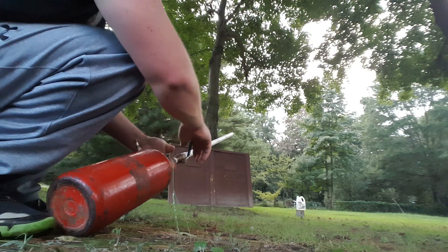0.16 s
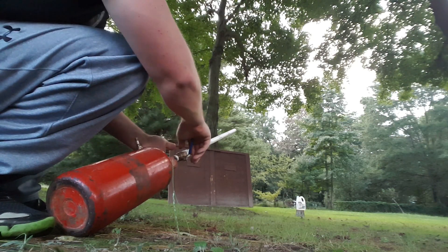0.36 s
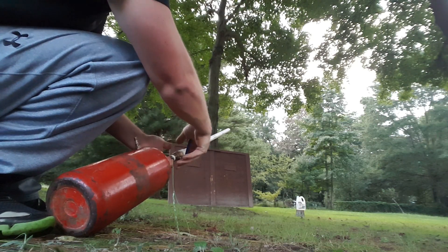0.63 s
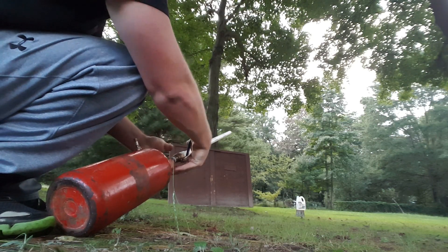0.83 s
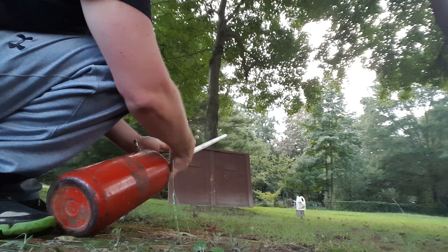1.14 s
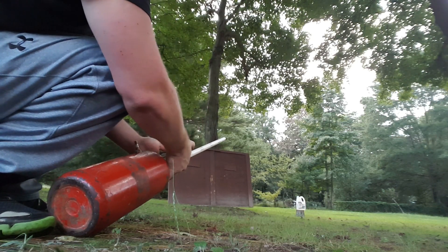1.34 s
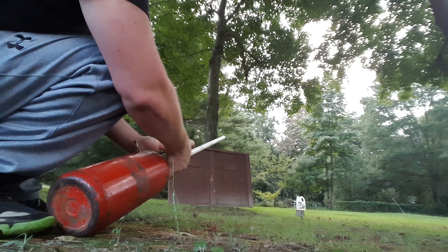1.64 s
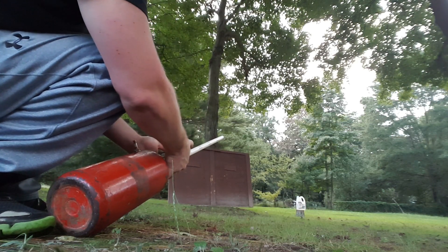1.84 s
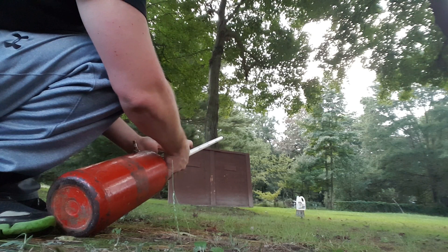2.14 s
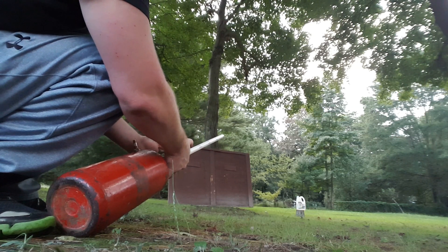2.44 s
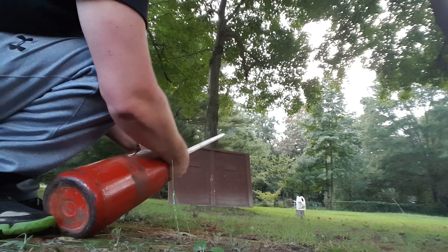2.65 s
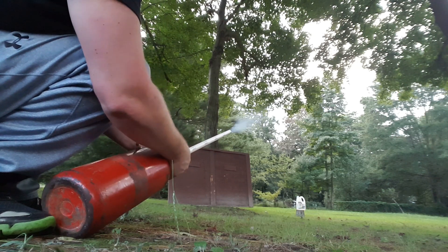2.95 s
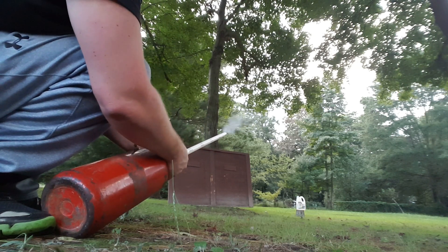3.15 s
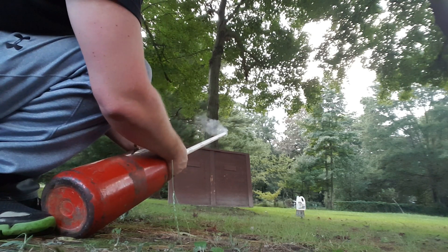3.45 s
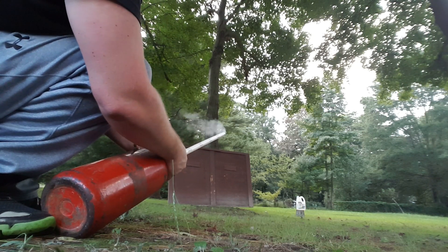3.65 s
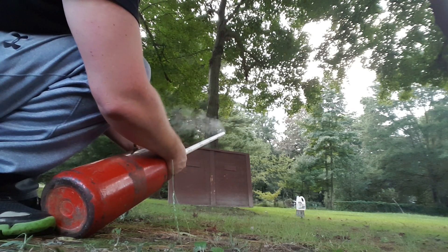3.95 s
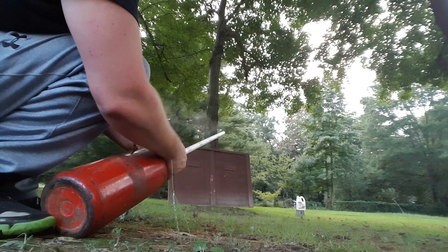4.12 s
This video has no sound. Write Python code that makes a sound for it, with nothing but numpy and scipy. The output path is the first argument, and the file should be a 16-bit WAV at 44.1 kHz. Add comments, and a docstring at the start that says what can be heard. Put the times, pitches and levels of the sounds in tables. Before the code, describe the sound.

A very quiet garden with rasping crickets and barely audible handling clicks is broken by an abrupt, overloaded bang right beside the microphone. A dense rush of escaping air follows, losing its bass first, whistling downward and collapsing into a brief hollow barrel hoot. The echo scatters through trees and dies away, leaving the hushed background turned down by automatic gain and slowly creeping back.

```python
"""A homemade air cannon is fired close by on a lawn, with insects chirping in the trees.
First, hands rub the tank and tick its valve. Then the valve opens and a shock leaves the barrel.
The tank empties in half a second of hiss: shaped noise for the roar, and a whistle that sinks with the pressure.
The trees echo it as a fading scatter of reflections. Behind it all lie far traffic, a faint hum and the insects.
A gain control turns everything down when it gets loud, then lets it creep back."""
import sys
import numpy as np
from scipy import signal
from scipy.fft import rfft, irfft
from scipy.io import wavfile

SR = 44100
rng = np.random.default_rng(int(sys.argv[2]) if len(sys.argv) > 2 else 0)


def dump(signal):
    """Clip the signal to [-1, 1] and save it as 16-bit WAV at the path in sys.argv[1]."""
    limited = np.clip(np.atleast_2d(signal).T, -1, 1)
    pcm = np.round(limited * 32767).astype(np.int16)
    wavfile.write(sys.argv[1], SR, pcm)


N = 189008
TIME = np.arange(N) / SR
FREQS = np.fft.rfftfreq(N, 1 / SR)

# colour of far traffic and faint hiss: (frequency [Hz], relative level per Hz [dB])
GARDEN_COLOUR = [(20, -24.5), (45, -13.5), (80, 0.5), (135, 0), (300, -11.5), (500, -17), (1200, -24.5),
                 (2100, -30), (3200, -38), (5500, -45.5), (7900, -40), (9700, -52.5), (12500, -49),
                 (15600, -43.5)]
# how alike left and right are in the garden: (frequency [Hz], correlation [-1 to 1])
GARDEN_LIKENESS = [(25, .75), (60, .92), (130, 1), (290, 0.77), (640, .15), (1410, -0.48), (3100, 0),
                   (15000, -0.068)]
# hum of a far machine: (frequency [Hz], level [dB])
MACHINE_HUM = [(118.4, -59), (1179, -69), (1222, -79)]
# bush crickets rasp at a steady pace:
# (middle of first call [s], end of song [s], period [s], call length [s], pitch [Hz], level [dB])
CRICKET_SONGS = [(.17, 2.7, .301, .16, 6315, -66.5), (3.62, 4.4, 0.3115, .16, 6320, -68.5),
                 (.19, 4.4, .327, .22, 6880, -68)]
# purer chirps that scoop up to their pitch: (middle [s], half length [s], level [dB])
PURE_CHIRPS = [(0.097, .06, -69.5), (.8, 0.15, -73), (1.51, .09, -72), (2.05, 0.111, -74), (4.15, .12, -79)]
# hands and cloth rub on the tank: (middle [s], length [s], centre [Hz], width [Hz], level [dB])
HAND_RUBS = [(0.798, 0.019, 5000, 7000, -65), (1.08, .12, 5970, 5000, -65.5), (1.29, 0.18, 3600, 550, -65),
             (2.319, 0.12, 3820, 300, -67.5)]
# the valve handle ticks under the fingers: (middle [s], level [dB])
HANDLE_TICKS = [(.835, -66), (1.635, -68), (2.154, -67), (2.299, -60), (2.56, -65.5)]
# how long the trees' echo takes to fade by 60 dB: (frequency [Hz], time [s])
TREE_FADE = [(200, 1), (1200, 0.46), (3300, 0.78), (6000, 0.55), (9000, 0.6), (11500, .6), (15000, .5)]
# how alike left and right are in the jet: (frequency [Hz], correlation [-1 to 1])
JET_LIKENESS = [(100, 0.99), (2100, 0.98), (2800, 0.73), (3200, 0.015), (3800, 0.012), (5200, .6),
                (7400, 0.93), (9000, 0.8), (9800, 0.094), (11000, -0.43), (12400, 0.21), (15000, 0.7)]
# colour of the roar from a full tank: (frequency [Hz], relative level per Hz [dB])
FULL_TANK = [(30, -18), (130, -3.5), (400, -3), (800, -2), (1300, -5), (2000, -5.5), (3200, -7.5),
             (4600, -8), (6500, -0.5), (7600, 0.5), (9200, 3.5), (9800, -10.5), (15600, -24.5)]
# colour of the roar from a nearly empty tank: (frequency [Hz], relative level per Hz [dB])
EMPTY_TANK = [(30, -23.5), (150, -17.5), (400, -20), (800, -7.5), (1700, -3.5), (2600, -5.5), (3600, -2.5),
              (4700, -3), (5700, 1), (7500, 0.5), (9200, 1), (9800, -11.5), (15600, -24)]
# colour of the fine fizz: (frequency [Hz], relative level per Hz [dB])
FIZZ_COLOUR = [(6000, -35.5), (9200, -8.5), (9700, 3), (11600, 4.5), (12350, 5), (12900, 6.5), (14300, 0),
               (15100, 3.5), (15500, 4.5)]
# fine fizz comes in two spurts: (middle [s], half length [s], level against the flow [dB])
FIZZ_SPURTS = [(2.68, .022, -2.5), (2.84, .11, -3)]
# valve resonances that need high pressure: (frequency [Hz], width [Hz], level against the flow [dB])
VALVE_MODES = [(7160, 160, -16), (7940, 130, -18.5), (8850, 150, -12), (9280, 170, -13)]
# the whistle catches twice: (middle [s], half length [s], width [Hz], level against the flow [dB])
WHISTLE_CATCHES = [(2.788, .16, 604, 0.5), (3.065, 0.026, 300, -4)]
# the barrel hoots as the last air leaves: (frequency [Hz], width [Hz], level [dB])
BARREL_MODES = [(744.5, 25, -40), (926, 50, -42.5), (1110, 110, -39.5), (1690, 40, -37.5),
                (1842, 55, -39.5), (1990, 83, -41.5), (2594, 66, -41), (2730, 47, -49), (3320, 70, -44)]

BANG_S = 2.6488
# the flow starts at the bang, sags slowly while the tank holds pressure, then collapses ever faster
FLOW_DB, ATTACK_S, SAG_DB_PER_S = 1.1, 0.0034, 17
COLLAPSE_S, COLLAPSE_DB_PER_S2 = 2.9897, 882


def amp(db):
    """Turns decibels into a gain."""
    return 10 ** (np.asarray(db) / 20)


def unit(x):
    """Scales a signal to an average strength (rms) of 1."""
    return x / np.sqrt(np.mean(x ** 2) + 1e-20)


def read(points, hz):
    """Joins (frequency, value) points by straight lines on a log-frequency axis."""
    f, value = np.transpose(points)
    return np.interp(np.log(hz + 1), np.log(f + 1), value)


def lag(x, seconds):
    """Smooths a signal so that it follows its input with a delay, like a slow needle."""
    keep = np.exp(-1 / (abs(seconds) * SR))
    return signal.lfilter([1 - keep], [1, -keep], x)


def peak(hz, width_hz, freqs=FREQS):
    """Gain of a steep-sided resonance; the width is taken at half power."""
    return 1 / (1 + ((freqs - hz) / (.78 * width_hz)) ** 2)


def noise(gain, likeness):
    """Stereo noise of rms 1 with a given gain and left-right likeness at each frequency."""
    a, b = rfft(rng.standard_normal((2, N)))
    correlation = np.clip(read(likeness, FREQS), -1, 1)
    mid = a * np.sqrt(1 + correlation)
    side = b * np.sqrt(1 - correlation)
    return unit(irfft(np.array([mid + side, mid - side]) * gain, N))


def resonant_noise(modes, likeness):
    """Turbulence rings in a set of resonances, each at its own rms level."""
    power = sum(amp(db) ** 2 * unit(peak(hz, width)) ** 2 for hz, width, db in modes)
    return np.sqrt(power.mean()) * noise(np.sqrt(power), likeness)


def wander(width_hz):
    """Random motion of rms 1; a smaller width makes it slower."""
    return unit(irfft(rfft(rng.standard_normal(N)) * peak(0, width_hz), N))


def swell(middle_s, half_s):
    """A smooth rise and fall of height 1."""
    return np.exp(-((TIME - middle_s) / half_s) ** 2)


def fuzzy_tone(pitch_hz, width_hz, spread):
    """A stereo noise band that follows a pitch curve; spread 0 is mono, 1 is unlike in the two channels."""
    turn = np.exp(2j * np.pi * np.cumsum(pitch_hz) / SR)
    mid, side = [(turn * (wander(width_hz) + 1j * wander(width_hz))).real for _ in range(2)]
    return np.array([mid + spread * side, mid - spread * side]) / np.sqrt(1 + spread ** 2)


def add_rustle(mix, middle_s, length_s, hz, width_hz, db, taper):
    """Adds a short swell of band noise, unlike in the two channels."""
    size = max(int(length_s * SR), 64)
    spectrum = rfft(rng.standard_normal((2, SR))) * peak(hz, width_hz, np.arange(SR // 2 + 1))
    band = irfft(spectrum, SR)[:, :size]
    rustle = amp(db) * unit(band) * signal.windows.tukey(size, taper)
    start = int(middle_s * SR) - size // 2
    part = mix[:, max(start, 0):start + size]
    part += rustle[:, max(-start, 0):][:, :part.shape[1]]


def garden(level_db=-42, sway_db=0.4, left_late_s=0.00019, waver_rad=.65,
           rise_s=1.0, rise_half_s=0.38, rise_hz=1000, rise_width_hz=700, rise_db=-63):
    """Far traffic, faint hiss and a wavering hum reach the left a little late; the middle range swells once."""
    air = amp(level_db + sway_db * wander(5.8)) * noise(amp(read(GARDEN_COLOUR, FREQS)), GARDEN_LIKENESS)
    rise = amp(rise_db) * swell(rise_s, rise_half_s) * noise(peak(rise_hz, rise_width_hz), GARDEN_LIKENESS)
    hum = 0
    for hz, db in MACHINE_HUM:
        phase = 2 * np.pi * hz * TIME + waver_rad * wander(4.9)
        hum = hum + amp(db) * np.sqrt(2) * np.sin(phase)
    left, right = air + rise + hum
    return np.array([np.roll(left, round(left_late_s * SR)), right])


def rasps(call_edge_s=.04, rasp_width_hz=90):
    """Bush crickets repeat fuzzy calls, each singer at its own steady pace."""
    out = np.zeros((2, N))
    for first, end, period, length, hz, db in CRICKET_SONGS:
        from_middle = (TIME - first + period / 2) % period - period / 2
        calls = np.clip((length / 2 - abs(from_middle)) / call_edge_s, 0, 1)
        calls = calls * (TIME > first - period / 2) * (TIME < end)
        out += amp(db) * calls * fuzzy_tone(np.full(N, hz), rasp_width_hz, spread=0.98)
    return out


def chirps(chirp_hz=4580, chirp_width_hz=70, scoop_hz_per_s=1200):
    """A cricket sings purer notes, each sliding up to its pitch by the middle of the chirp."""
    loudness = sum(amp(db) * swell(s, half) for s, half, db in PURE_CHIRPS)
    early_s = sum((s - TIME) * (TIME < s) * (TIME > s - 2 * half) for s, half, db in PURE_CHIRPS)
    return loudness * fuzzy_tone(chirp_hz - scoop_hz_per_s * early_s, chirp_width_hz, spread=0.87)


def insects(chorus_hz=6620, chorus_width_hz=480, chorus_db=-68.0, throb_hz=38, throb=0.17):
    """A steady far chorus and a few nearer singers throb with their wing strokes."""
    chorus = amp(chorus_db) * noise(peak(chorus_hz, chorus_width_hz) ** 2, GARDEN_LIKENESS)
    wing_strokes = 1 + throb * np.sin(2 * np.pi * throb_hz * TIME + wander(6.4))
    return (chorus + rasps() + chirps()) * wing_strokes


def hands(right_db=2.0, tick_length_s=0.022, tick_hz=3980, tick_width_hz=900):
    """Hands finding the valve make soft rubs and ticks, short bursts of band noise louder on the right."""
    out = np.zeros((2, N))
    for row in HAND_RUBS:
        add_rustle(out, *row, taper=0.62)
    for s, db in HANDLE_TICKS:
        add_rustle(out, s, tick_length_s, tick_hz, tick_width_hz, db, taper=0.65)
    return out * amp([[-right_db], [right_db]])


def trees(x, echo_db=-19, build_s=0.018):
    """Trunks and leaves scatter the sound back, each band dying at its own speed."""
    taps = rng.standard_normal((2, SR))
    hz, t, bands = signal.stft(taps, SR, nperseg=256)
    decay = amp(-60 * t / read(TREE_FADE, hz)[:, None]) * (1 - np.exp(-t / build_s))
    tail = signal.istft(bands * decay, SR, nperseg=256)[1]
    tail = tail / np.linalg.norm(tail[0])
    return amp(echo_db) * signal.fftconvolve(x.mean(0)[None], tail, axes=1)[:, :N]


def nearby(x, apart=0.75, direct_db=-1.6):
    """Ground, tank and the crouching body throw back many quick reflections that comb the hiss."""
    t = np.arange(SR // 25) / SR
    # nothing returns in the first 1 ms; then the reflections fade over 12 ms
    shared, own = rng.standard_normal((2, len(t))) * (t > .001) * np.exp(-t / .012)
    taps = np.array([shared + apart * own, shared - apart * own])
    taps = amp(-6) * taps / np.linalg.norm(taps[0])
    return amp(direct_db) * (x + signal.fftconvolve(x, taps, axes=1)[:, :N])


def flow(collapse_s):
    """Strength of the air stream: a sudden start, a slow sag, then a collapse."""
    age = np.maximum(TIME - BANG_S, 0)
    db = FLOW_DB - SAG_DB_PER_S * age - COLLAPSE_DB_PER_S2 * np.maximum(TIME - collapse_s, 0) ** 2
    return amp(db) * (1 - np.exp(-age / ATTACK_S))


def hoot(hoot_s=3.165, hoot_length_s=0.043):
    """The barrel's resonances sound briefly as the last air leaves."""
    return resonant_noise(BARREL_MODES, JET_LIKENESS) * swell(hoot_s, hoot_length_s)


def whistle(start_hz=8010, sink_hz_per_s2=11600, build_s=.02, spread=.3):
    """Eddies shed at the valve's edge make a fuzzy tone that sinks ever faster as the air slows."""
    age = np.maximum(TIME - BANG_S, 0)
    pitch_hz = np.maximum(start_hz - sink_hz_per_s2 * age ** 2, 0)
    tone = 0
    for s, half, width, db in WHISTLE_CATCHES:
        tone = tone + amp(db) * swell(s, half) * fuzzy_tone(pitch_hz, width, spread)
    return tone * (1 - np.exp(-age / build_s))


def fizz(steady_db=-11.5, left_db=.8):
    """High, fine noise in the air stream swells in spurts, a little louder on the left."""
    spurts = amp(steady_db) + sum(amp(db) * swell(s, half) for s, half, db in FIZZ_SPURTS)
    return spurts * noise(amp(read(FIZZ_COLOUR, FREQS)), JET_LIKENESS) * amp([[left_db], [-left_db]])


def jet(leak_s=2.622, leak_db=-32.5, half_empty_s=2.796, emptying_s=0.035, dull_hz=4280, linger_s=0.035,
        flutter_db=1.0, left_db=0.5):
    """The valve leaks, then the tank empties: the roar loses its bass, and later its treble dies first."""
    empty = .5 + .5 * np.tanh((TIME - half_empty_s) / (2 * emptying_s))
    full_roar = noise(amp(read(FULL_TANK, FREQS)), JET_LIKENESS) + resonant_noise(VALVE_MODES, JET_LIKENESS)
    spent_roar = noise(amp(read(EMPTY_TANK, FREQS)), JET_LIKENESS)
    roar = np.sqrt(1 - empty) * full_roar + np.sqrt(empty) * spent_roar
    # the part of the roar below dull_hz lingers after the treble
    dull_roar = signal.filtfilt(*signal.butter(2, dull_hz, fs=SR), roar)
    bright_air = roar - dull_roar + fizz() + whistle()
    air = bright_air * flow(COLLAPSE_S) + dull_roar * flow(COLLAPSE_S + linger_s)
    air = air * amp(flutter_db * wander(170))
    # the valve cracks open and its leak grows until the bang
    leak = amp(leak_db) * spent_roar * np.interp(TIME, [leak_s, BANG_S], [0, 1], right=0)
    return (leak + air + hoot()) * amp([[left_db], [-left_db]])


def muzzle_shock(t, shock_db=15, push_s=0.00019, top_hz=2900, order=4):
    """The shock leaves the muzzle as a push of air followed by a suck."""
    u = t / push_s
    shock = amp(shock_db) * (t > 0) * (1 - u) * np.exp(-u * u / 4)
    # a narrow muzzle radiates little bass, and beams its treble forwards, away from the listener
    less_bass = shock - lag(shock, seconds=0.00041)
    return signal.lfilter(*signal.butter(order, top_hz, fs=SR), less_bass)


def valve_shriek(t, ring_db=6.5, ring_hz=7300, ring_s=0.0021, beat_hz=480, beat=0.28):
    """The valve rings for a few ms while its close modes beat against each other; weaker on the right."""
    ring = amp(ring_db) * t / ring_s * np.exp(1 - t / ring_s) * np.sin(2 * np.pi * ring_hz * t)
    ring = ring * (1 - beat * np.sin(2 * np.pi * beat_hz * t))
    return ring * amp([[0], [-2.5]])


def tank_recoil(t, thump_db=-10.5, thump_hz=110, thump_s=0.022, knock_db=-6, knock_hz=340, knock_s=0.0098,
                low_hz=45):
    """The tank recoils with a low thump and a quicker knock, two fading sine waves."""
    thump = amp(thump_db) * np.exp(-t / thump_s) * np.sin(2 * np.pi * thump_hz * t)
    knock = amp(knock_db) * np.exp(-t / knock_s) * np.sin(2 * np.pi * knock_hz * t)
    return signal.lfilter(*signal.butter(2, low_hz, "high", fs=SR), thump + knock)


def bang():
    """At the same instant the shock leaves, the valve shrieks and the tank recoils."""
    t = np.maximum(TIME - BANG_S, 0)
    return muzzle_shock(t) + tank_recoil(t) + valve_shriek(t)


def scene():
    """The cannon and its echo in the garden."""
    cannon = nearby(jet()) + bang()
    return garden() + insects() + hands() + trees(cannon) + cannon


def record(dry, threshold_db=-23.5, squeeze=0.62, recovery_db_per_s=19.0, sense_s=0.0051, attack_s=0.00047,
           ceiling=0.83, edge_hz=15850):
    """Gain drops when the sound is loud and creeps back; peaks above the ceiling clip; the top is cut off."""
    power_db = 10 * np.log10(lag((dry ** 2).mean(0), sense_s) + 1e-12)
    cut_db = squeeze * np.maximum(power_db - threshold_db, 0)
    # a running maximum on a rising slope lets each cut fade at a steady speed
    creep = recovery_db_per_s * TIME
    held_db = np.maximum.accumulate(cut_db + creep) - creep
    ducked = dry * amp(-lag(held_db, attack_s))
    clipped = np.clip(ducked, -ceiling, ceiling)
    low_pass = signal.firwin(511, edge_hz, window=("kaiser", 9), fs=SR)
    return signal.oaconvolve(clipped, low_pass[None], "same")


dry = scene()
out = record(dry)
dump(out)
```